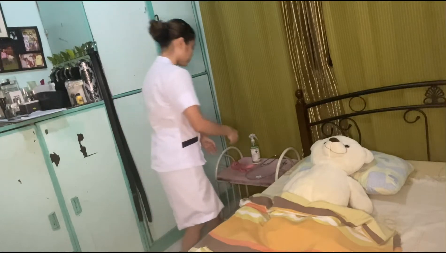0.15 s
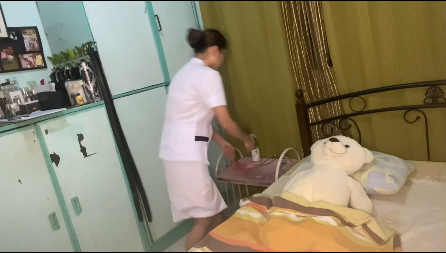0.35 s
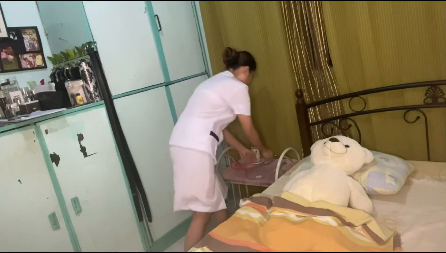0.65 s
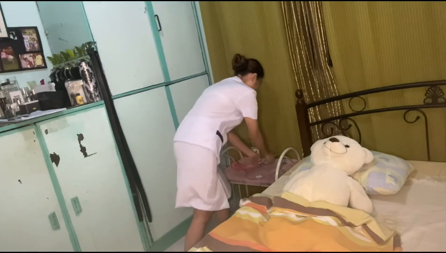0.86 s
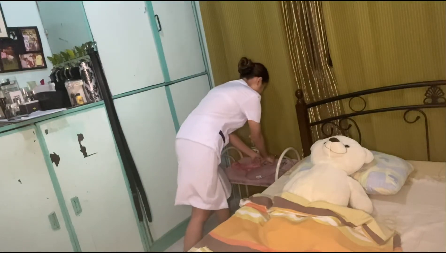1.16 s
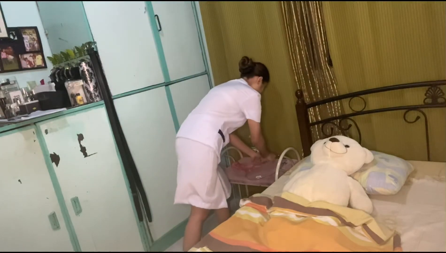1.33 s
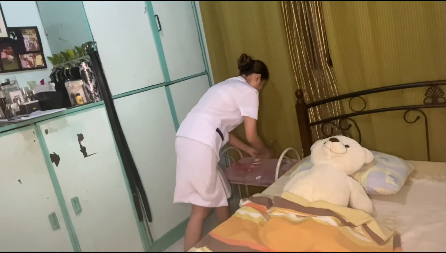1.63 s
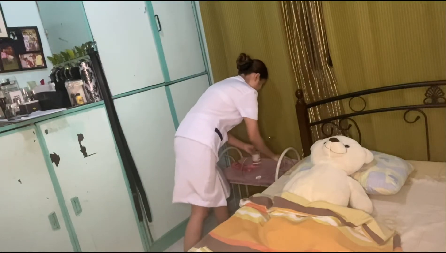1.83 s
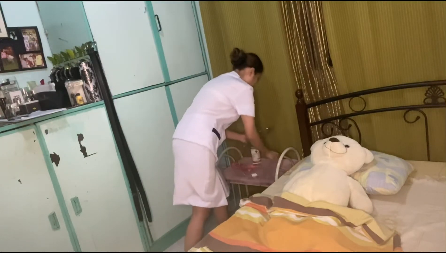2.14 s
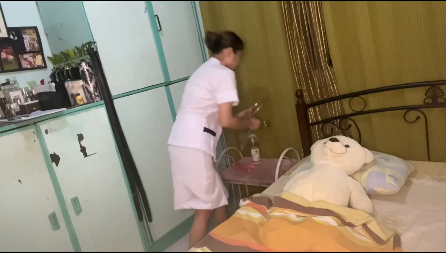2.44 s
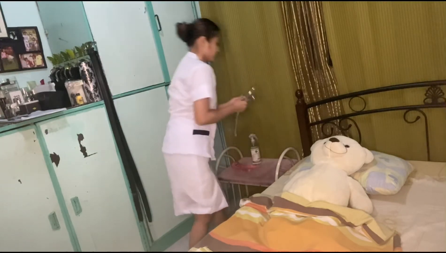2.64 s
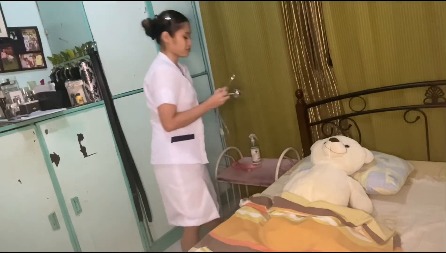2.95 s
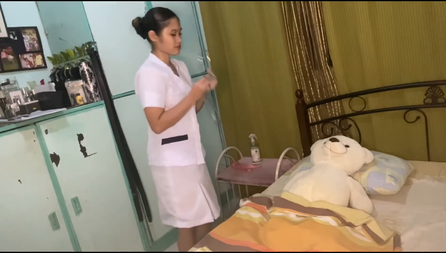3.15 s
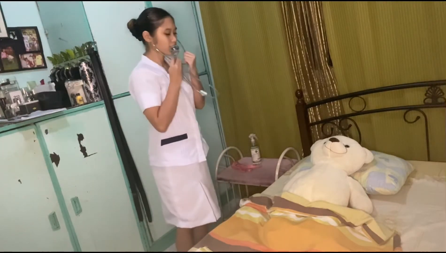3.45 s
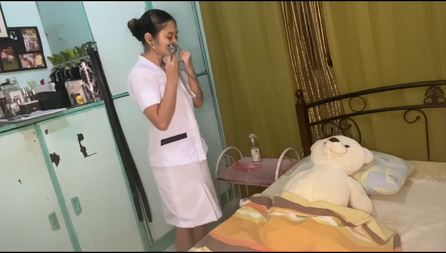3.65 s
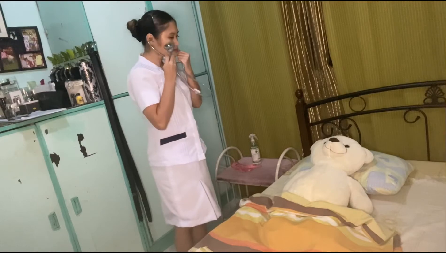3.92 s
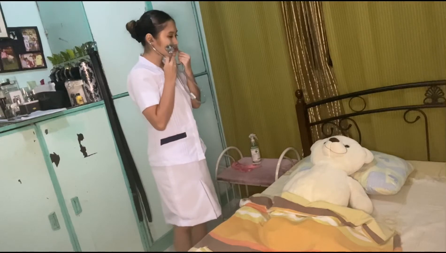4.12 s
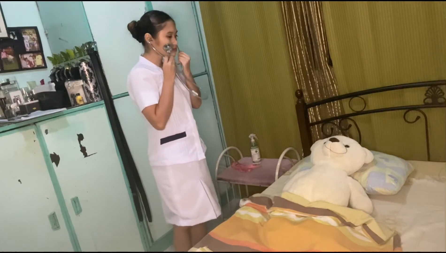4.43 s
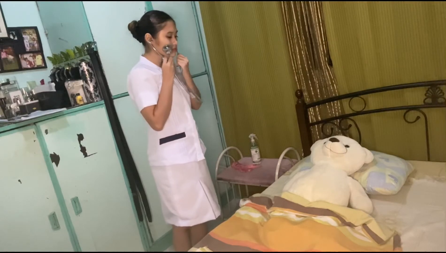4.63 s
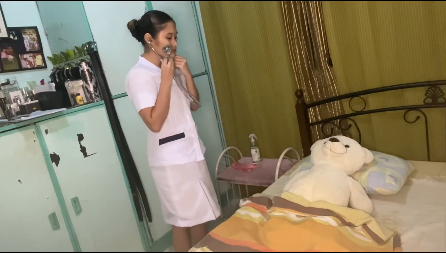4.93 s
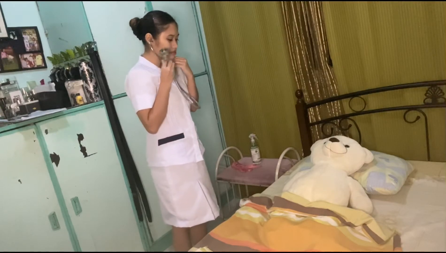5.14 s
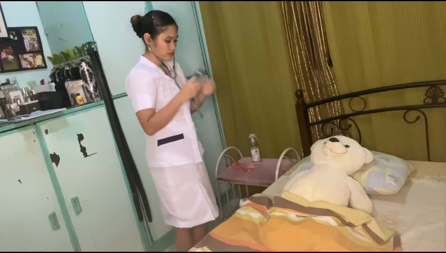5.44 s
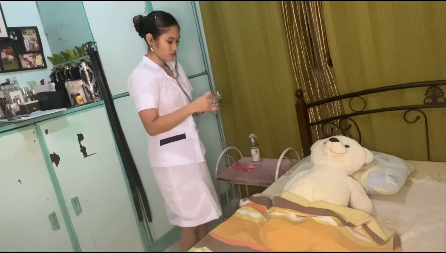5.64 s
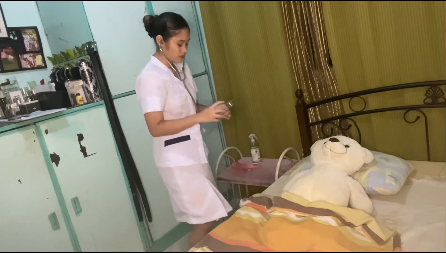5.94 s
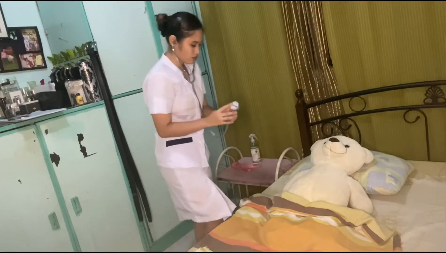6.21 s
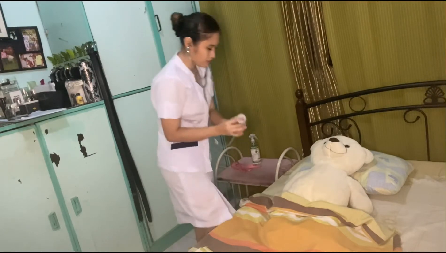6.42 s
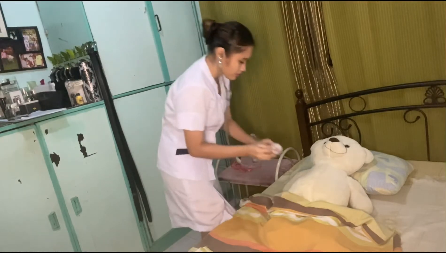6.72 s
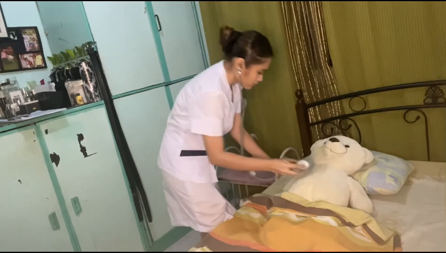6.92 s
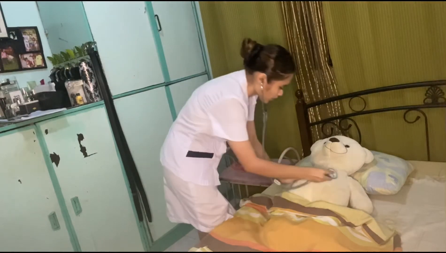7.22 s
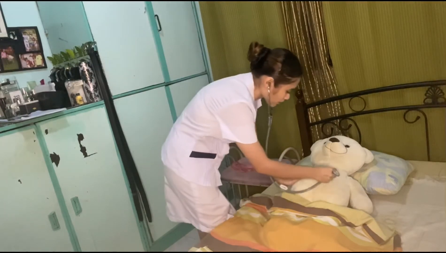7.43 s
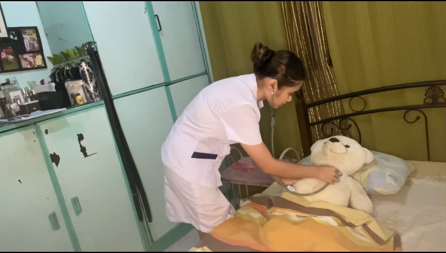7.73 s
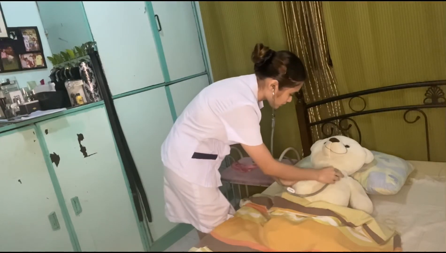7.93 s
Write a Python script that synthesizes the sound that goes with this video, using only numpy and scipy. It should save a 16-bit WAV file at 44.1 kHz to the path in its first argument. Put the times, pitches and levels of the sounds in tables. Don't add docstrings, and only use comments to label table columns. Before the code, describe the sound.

In a small quiet bedroom, a ventilation unit hums at one steady low pitch, with a deeper fan drone and soft room rumble beneath. Much fainter air rush and hiss flutter unevenly above, as if a noise suppressor briefly dulls them. Slight cloth rustles barely surface near the start, around three seconds and around six. Stereo microphones hear the room, the hum leaning left.

```python
import sys
import numpy as np
from scipy import signal
from scipy.fft import rfft, irfft, next_fast_len
from scipy.io import wavfile
from scipy.ndimage import uniform_filter1d, map_coordinates

SR = 44100
rng = np.random.default_rng(int(sys.argv[2]) if len(sys.argv) > 2 else 0)


def invert_db(level):
    return 10 ** (np.asarray(level, dtype=float) / 20)


def store_wav(level_fs):
    pcm = np.round(np.clip(np.atleast_2d(level_fs), -1, 1) * 32767)
    wavfile.write(sys.argv[1], SR, pcm.T.astype(np.int16))


N = 355887


def unit(x):
    return x / np.sqrt(np.mean(x ** 2) + 1e-20)


def along(points, hz):
    f, v = np.transpose(points)
    return np.interp(np.log(hz + 1), np.log(f + 1), v)


def curves(rows):
    s, *columns = np.transpose(rows)
    return [np.interp(np.arange(N) / SR, s, column) for column in columns]


def wobble(rate):
    steps = np.arange(0, N + 256, 256)
    knots = rng.standard_normal(200)
    return np.interp(np.arange(N), steps, map_coordinates(knots, [steps * rate / SR]))


def swells(rows):
    t = np.arange(N) / SR
    return sum(db * np.exp(-((t - s) / width) ** 2) for s, db, width in rows)


def motor():
    # multiple of pull rate, multiple of shaft rate, left level/dB rms, right-left/dB, left lead/rad
    hum = [(1, 0, -35.1, -4.5, -0.01), (1, 1, -33.0, -0.5, 0.18), (2, -1, -43.5, -3.2, 0.74),
           (2, 0, -18.8, -3.8, 0.23), (2, 1, -41.5, -6.8, 0.25), (2, 2, -43.3, -2.0, 0.25),
           (5, 0, -49.4, 0.6, -0.01), (6, -1, -52.3, 1.0, 1.87), (6, 0, -38.4, 8.5, -2.62),
           (8, 0, -60.2, 3.4, -2.09), (9, 0, -59.7, 0.5, 1.52)]
    # t/s, side tone level change/dB
    imbalance = [(0, -1), (1, -6), (1.7, -8), (2.3, -4), (2.8, 0), (3.6, 1), (4.3, -1), (5.2, -1), (6.2, 0),
                 (7, -3), (7.6, 4), (8.07, -4)]
    # t/s, level change/dB
    body = [(0, -0.5), (.6, 1.5), (1.7, .9), (2.45, 1.6), (3.0, -.6), (6.7, -.5), (7.2, 0), (8.07, -.1)]
    shaft_hz, standing_top = 12.82, 2
    t = np.arange(N) / SR
    pull_hz = 120.226 - .004 * t
    pull = 2 * np.pi * np.cumsum(pull_hz) / SR
    shaft = 2 * np.pi * shaft_hz * t
    imbalance_db, = curves(imbalance)
    body_db, = curves(body)
    shade_db = np.linspace(.2, -.6, N)
    out = np.zeros((2, N))
    for k, j, db, right_db, lead in hum:
        waver = np.clip((-18 - db) / 20, 0, 1.5)
        phase = k * pull + j * shaft + 1.04 * abs(j) + 0.18 * waver * wobble(4.5)
        change_db = imbalance_db if j else body_db * (k <= standing_top)
        level = np.sqrt(2) * invert_db(db + change_db + 0.52 * waver * wobble(9) - 0.25 * waver)
        left = np.sin(phase + lead / 2)
        right = invert_db(right_db + shade_db) * np.sin(phase - lead / 2)
        out += level * np.array([left, right])
    return out


def blades():
    # t/s, f/Hz, level/dB rms
    drone = [
        (0, 63.95, -29),
        (2, 63.9, -31.5),
        (4, 63.9, -29),
        (5.2, 64.3, -34.5),
        (6, 64.9, -37),
        (7, 65.2, -31),
        (8.07, 65.2, -33),
    ]
    hz, db = curves(drone)
    phase = 2 * np.pi * np.cumsum(hz) / SR + 0.19 * wobble(2.8)
    tone = np.sqrt(2) * invert_db(db + 1.6 * wobble(2.67)) * np.sin(phase)
    return tone * invert_db([[.5], [-.5]])


def air(spectrum, patchy_db, ripple_db, modes=()):
    # f/Hz, left-right likeness
    alike = [(60, 0.8), (200, 1.3), (300, 0.53), (450, 0.28), (1000, 0.36), (2000, 0.45), (4000, 0.2),
             (7000, 0.3), (9000, 1.3), (15000, 3.5)]
    # f/Hz, left-right/dB
    lean = [(60, 5.5), (150, 0.5), (280, -0.5), (440, 1), (850, -2), (1100, 0), (1600, 0.5), (2500, 4),
            (6000, 3.5), (8200, 4), (8700, 0)]
    # f/Hz, phase scatter/rad
    scatter = [(250, 0), (600, 1.81), (1500, 1.5), (5500, 1.8), (7500, 0)]
    port_lag_s = 0.0001662
    diffuse = .25

    z = signal.stft(rng.standard_normal((2, N)), nperseg=512)[2]
    field = uniform_filter1d(rng.standard_normal(z.shape[1:]), size=6, axis=0)
    field = uniform_filter1d(field, size=12, axis=1)
    noise = signal.istft(z * invert_db(patchy_db * unit(field)), nperseg=512)[1]
    length = next_fast_len(N + 8192)
    a, b = rfft(noise, length)
    hz = np.fft.rfftfreq(length, 1 / SR)

    power = 1
    for centre, width, left_db, right_db in modes:
        power = power + invert_db(np.c_[[left_db, right_db]]) ** 2 / (1 + (2 * (hz - centre) / width) ** 2)
    ripple = np.array([map_coordinates(knots, [hz / 22]) for knots in rng.standard_normal((2, 1200))])
    ripple = ripple * np.clip(hz / 600, 0, 1)

    turn = np.arccos(np.clip(along(alike, hz), 0, 1)) / 2
    mid, side = a * np.cos(turn), b * np.sin(turn)
    spread = along(scatter, hz)
    echo_phase = spread * map_coordinates(rng.standard_normal(600), [hz / 45])
    lag_phase = np.pi * hz * port_lag_s * (1 - diffuse * spread)
    tilt = invert_db(along(lean, hz) / 2) * np.exp(1j * (lag_phase + .5 * echo_phase))
    pair = np.array([(mid + side) * tilt, (mid - side) / tilt])
    pair = pair * invert_db(along(spectrum, hz)) * np.sqrt(power) * invert_db(ripple_db * ripple)
    return unit(irfft(pair, length)[:, :N])


def suppressor():
    # t/s of the deepest point, depth/dB, time to sink/s
    dips = [(0.0, 2, .05), (.57, 1.5, .25), (1.01, 6.5, 0.057), (1.55, 6, 0.2), (2.09, 7.5, 0.16),
            (2.25, 3, 0.042), (2.9, 1.5, 0.073), (3.02, 4, 0.05), (3.52, 3, 0.25), (3.97, 7, 0.16),
            (4.35, 2.2, 0.25), (4.95, 6.5, 0.086), (5.32, 2, 0.12), (5.81, 8.5, 0.15), (6.22, 2.5, 0.19),
            (6.91, 4.5, 0.056), (7.3, 3.5, 0.12), (7.46, 0.5, 0.075), (7.75, 3.5, 0.19), (8.05, 8, .06)]
    recover_s, sink_shape = 0.073, 1.24
    t = np.arange(N) / SR
    gain_db = np.zeros(N)
    for s, depth_db, sink_s in dips:
        ramp = np.where(t < s, 1 + (t - s) / sink_s, 1 - (t - s) / recover_s)
        gain_db -= depth_db * np.clip(ramp, 0, 1) ** sink_shape
    return gain_db


def airflow():
    # t/s, level/dB
    flow = [(0, -38.5), (1, -39), (2, -39), (2.8, -38.5), (3.2, -39), (3.7, -38.5), (4.3, -40), (5.2, -40),
            (5.7, -38), (6.8, -40), (8.07, -40.5)]
    # f/Hz, density/dB per Hz
    rumble_band = [(5, -25), (32, -16.5), (55, -2), (100, -3), (150, 0.5), (230, 1.5), (290, -6), (420, -6),
                   (500, -10.5), (700, -14), (950, -15.5), (1150, -23), (1500, -31), (2500, -65)]
    murmur_band = [(380, -40), (510, -1), (580, 1), (700, 0), (820, -1), (950, -1.5), (1150, -8),
                   (1500, -46)]
    rush_band = [(700, -52), (1000, -3.5), (1300, -3), (2000, 1), (2600, -0.5), (3200, -8), (3500, -22),
                 (4500, -76)]
    hiss_band = [(2200, -39), (3000, -5.5), (3500, -0.5), (5000, -1), (6100, -2.5), (7300, -2),
                 (8100, -3.5), (8500, -7.5), (9000, -34), (9600, -64)]
    fizz_band = [(7400, -50), (8200, -6), (8700, 0), (9800, -2.5), (11000, -5), (12000, -6), (13000, -8.5),
                 (14000, -7), (15200, -8), (15700, -12), (15900, -40)]
    # f/Hz, width/Hz, left level/dB, right level/dB
    room = [(63.3, 5.5, 6, 9.5), (75.5, 3.6, 13, 14.5), (127.8, 7.1, 9, 14.5), (136, 5.1, 13.5, 12.5),
            (153, 7.6, 4, -1), (201, 4, 1.5, -6), (312, 17, 4, 1), (379, 39, 2.5, 4), (452, 15.4, 0, 10.5),
            (570, 34, 2.5, -1.5), (618, 25, 4, 6.5), (687, 17.6, 10.5, 9.5), (748, 16, 8, 7.5),
            (827, 41, -4, 6), (830, 31, -1.5, 2.5), (893, 27, 4.5, 4.5), (269, 12, 0.5, -1),
            (950, 44, 3.5, 4), (1110, 22, 10, 3)]
    # f/Hz, width/Hz, left level/dB, right level/dB
    outlet = [(1254, 39, 2.5, -9), (1354, 28, 1.5, -2), (1611, 45, 6.5, 3.5), (1954, 48, 3.5, 2),
              (2140, 26, -7.5, -1.5), (2386, 33, 2, -7), (2430, 23, 2.5, -1), (2960, 50, 3, 2.5),
              (3283, 69, 3.5, 2)]
    # t/s, lift/dB, half width/s
    gusts = [(.2, 2, 0.069), (.82, 2, 0.11), (1.25, 3, .15), (1.8, 3, 0.1), (2.6, 2.5, .2),
             (3.15, 1.5, 0.091), (3.72, 3.5, 0.1), (4.14, 1, 0.052), (6.0, 3, 0.086), (6.42, 0, 0.061),
             (7.1, 2.5, .12)]
    # t/s, lift of the fizz/dB, half width/s
    rustles = [
        (.5, 4, 0.36),
        (1.35, 1.5, .1),
        (2.75, 4, 0.18),
        (3.13, 4.5, .12),
        (5.97, 5, 0.11),
        (7.05, 3, 0.094),
        (7.53, 1, .06),
    ]
    dip_db, gust_db = suppressor(), swells(gusts)
    rush_db = dip_db + gust_db

    rumble = air(rumble_band, patchy_db=1.3, ripple_db=-0.5, modes=room)
    rumble *= invert_db(curves(flow)[0] + 10.5)
    murmur = air(murmur_band, patchy_db=2.5, ripple_db=3.5, modes=room)
    murmur *= invert_db(-42.5 + 0.53 * rush_db)
    rush = air(rush_band, patchy_db=1.1, ripple_db=1.7, modes=outlet)
    rush *= invert_db(-39 + rush_db + 0.52 * wobble(12))
    hiss = air(hiss_band, patchy_db=0.95, ripple_db=1.9)
    hiss *= invert_db(-44 + dip_db + .4 * gust_db + 0.53 * wobble(16))
    fizz = air(fizz_band, patchy_db=1.7, ripple_db=1.0)
    fizz *= invert_db(-54.5 + dip_db + swells(rustles) + .7 * wobble(16))
    return rumble + murmur + rush + hiss + fizz


def scene():
    opening = np.sin(np.pi / 2 * np.clip(np.arange(N) / SR / .004, 0, 1)) ** 2
    return opening * (motor() + blades() + airflow())


def top_cut(x):
    return signal.sosfilt(signal.butter(12, 15730, fs=SR, output="sos"), x)


def record(dry):
    return top_cut(dry)


dry = scene()
out = record(dry)
store_wav(out)
```